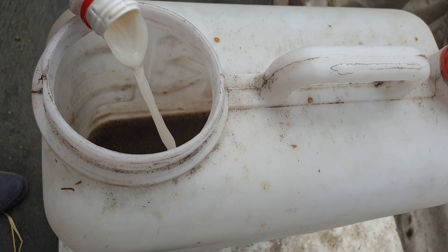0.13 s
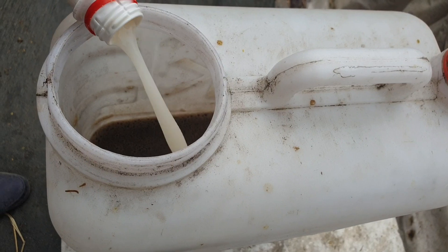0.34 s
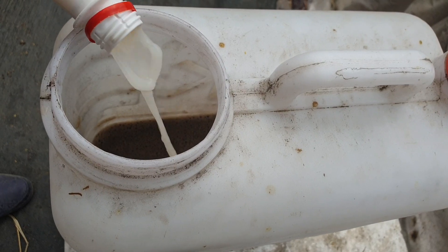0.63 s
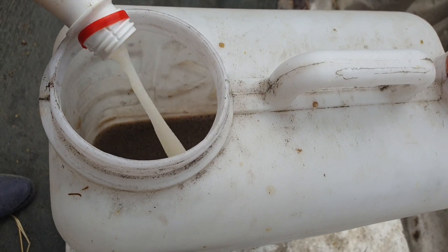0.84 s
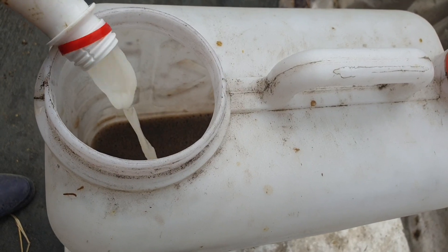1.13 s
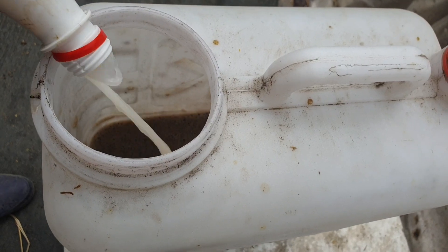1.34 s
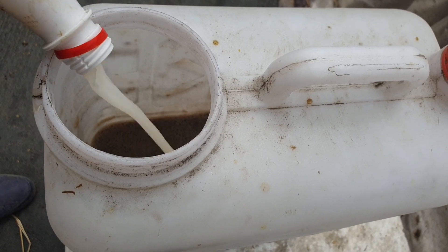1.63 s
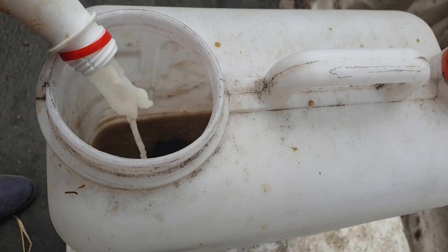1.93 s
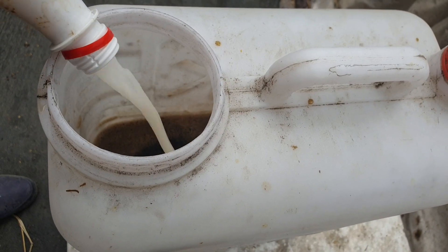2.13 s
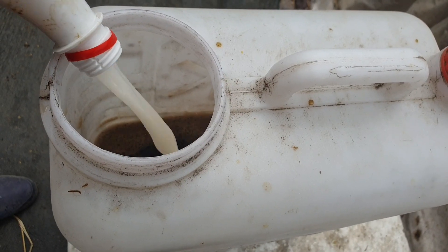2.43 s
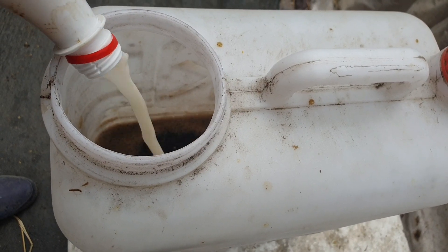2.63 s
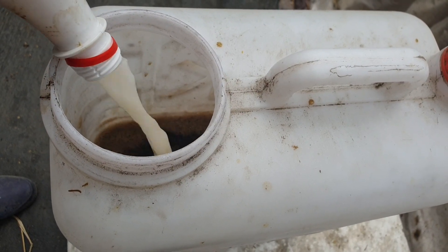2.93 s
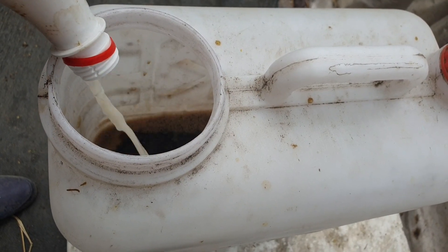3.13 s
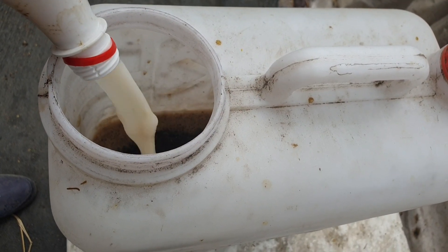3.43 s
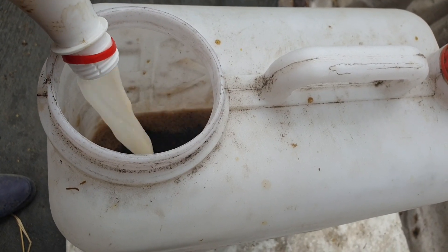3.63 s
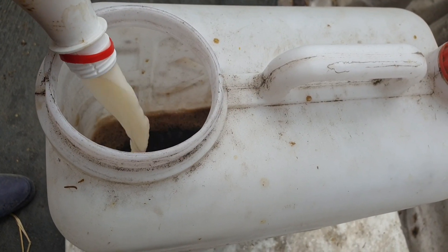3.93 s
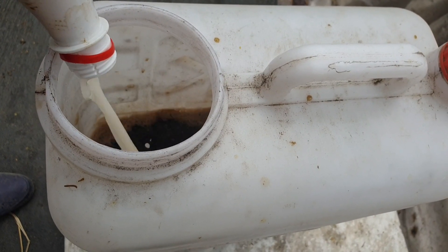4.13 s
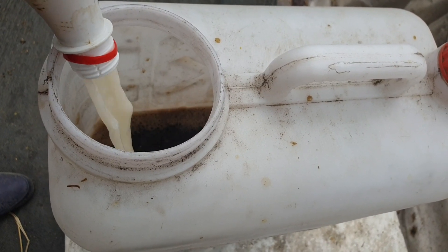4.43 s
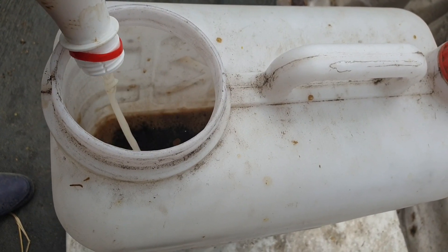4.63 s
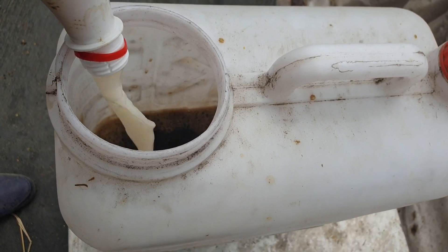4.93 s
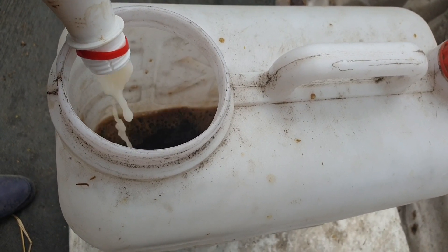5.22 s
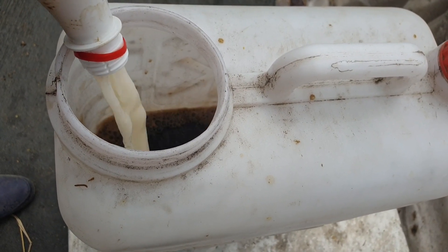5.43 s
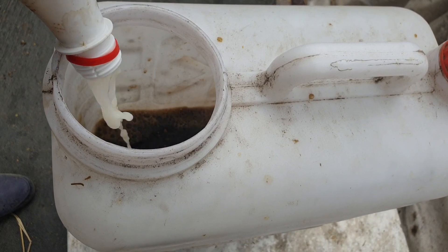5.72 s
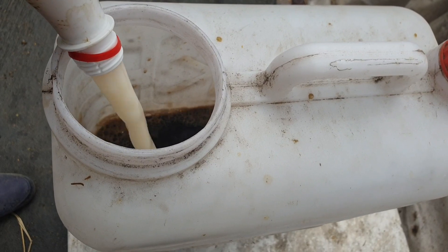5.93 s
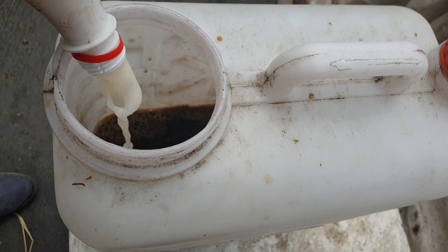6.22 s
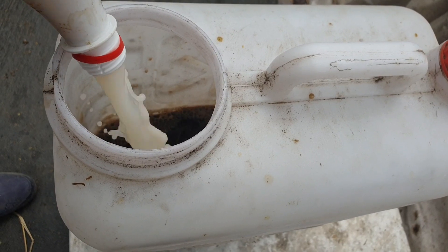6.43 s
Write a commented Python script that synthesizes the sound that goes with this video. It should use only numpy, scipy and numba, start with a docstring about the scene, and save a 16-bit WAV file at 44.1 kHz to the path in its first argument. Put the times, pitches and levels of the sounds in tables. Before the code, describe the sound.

Uneven gulping pour into a hollow plastic container, deep bubbling and bright spatter growing fuller, then a cluster of loud bottle clicks.

```python
"""Over a quiet outdoor floor come a few soft drips and glugs, then a stream from a bottle plunges into
a part-filled plastic jug, close below a phone. Trapped air bubbles, built from decaying sines that climb in
pitch, ring the air and walls of the jug. Filtered noise and short grains make the droplets, which spatter
in clumps. Towards the end the squeezed bottle snaps, each snap a short burst of noise.
The left microphone port hears the treble a little before the right."""
import sys
import numpy as np
from scipy import signal
from scipy.fft import rfft, irfft
from scipy.io import wavfile
from scipy.ndimage import uniform_filter1d
from numba import njit

SR = 44100
rng = np.random.default_rng(int(sys.argv[2]) if len(sys.argv) > 2 else 0)


def volts(x):
    """Linear amplitude factor 10**(x/20) for a level x in dB, scalar or array-like."""
    e = np.asarray(x, float) / 20
    return 10 ** e


def file_out(sig):
    """Save sig as 16-bit WAV at sys.argv[1]."""
    # one column per channel
    cols = np.atleast_2d(sig).T
    # limit, then scale
    lim = np.clip(cols, -1, 1)
    pcm = np.round(lim * 32767).astype(np.int16)
    wavfile.write(sys.argv[1], SR, pcm)


N = 290178  # length in samples
T = np.arange(N) / SR  # seconds
COARSE = T[::44]  # about one moment a millisecond, for the moving levels

# How hard the stream lands and how much it breaks into droplets, before each layer's own trim.
# Each row: time in seconds, flow in dB, break-up in dB.
FLOW = [(0, -80, -73.5), (0.2, -60, -66.5), (0.9, -50.5, -67.5), (1.06, -50.5, -57), (1.2, -50.5, -60),
        (1.6, -40.5, -52), (2.2, -40, -54), (2.9, -38, -52.5), (3.2, -41, -54), (3.6, -36.5, -50.5),
        (4.1, -37.5, -51), (4.7, -35, -50), (5.0, -40, -51.5), (5.4, -35.5, -49), (5.75, -35.5, -51),
        (5.9, -41.5, -54.5), (6.2, -42.5, -54.5), (6.58, -43, -56)]
# The stream thins as the bottle gulps air, then comes back at once.
# Each row: return in seconds, depth in dB before the layer's share, thinning time in seconds.
BREAKS = [(1.501, 6, 0.074), (1.74, 6, 0.14), (2.031, 6, 0.032), (2.32, 3, 0.065), (2.549, 7.5, 0.046),
          (2.636, 6.5, 0.027), (2.84, 6, 0.066), (3.068, 6.5, 0.11), (3.35, 8.5, 0.038), (3.633, 8, 0.0056),
          (4.205, 4, 0.11), (4.46, 2.5, 0.042), (5.455, 3.5, 0.093), (5.531, 6.5, 0.069),
          (5.65, 2.5, 0.033), (6.125, 9, 0.052), (6.457, 10, 0.037), (6.557, 9, 0.076)]
# How deeply each layer feels a break.
# One factor each, without unit, for plunge, froth, throb, splash and fizz.
BREAK_SHARES = (1.54, 2, 0.29, 1.32, 1.02)
# Heavy slugs of liquid landing.
# Each row: landing in seconds, extra plunge in dB, extra froth in dB.
SLUGS = [(0.146, 21, 22), (0.29, 8, 8), (0.62, 8, 3), (1.109, 21.5, 14), (1.329, 15, 11.5), (1.529, 9, 9),
         (1.769, 4.5, 6.5), (1.88, 5, 4), (2.66, 4, 3.5), (2.97, 1, 0), (3.27, 8.5, 8.5),
         (3.383, 11.5, 6.5), (3.82, 4, 4), (4.06, -1.5, 1.5), (4.219, 7, 6), (4.62, 0, -2.5),
         (5.136, 15, 5), (5.575, 3.5, 4), (6.058, 13, 9), (6.43, 5, 5.5), (6.57, 12.5, 7)]
# The flat side of the jug heaving as the liquid sloshes.
# Each row: crest in seconds, extra throb in dB.
HEAVES = [(1.13, 15.5), (1.2, 15), (1.42, 12), (1.7, 17), (1.91, 12.5), (2.22, 9), (2.49, 7), (2.72, 13),
          (2.99, 12), (3.17, 14), (3.5, 11), (3.76, 6), (4.24, 10.5), (4.5, 5.5), (4.67, 5.5), (4.85, 5),
          (5.0, 7), (5.2, 9), (5.58, 8), (5.94, 9), (6.21, 10.5)]
# Sheets of spray thrown up; a negative extra is a dip.
# Each row: peak in seconds, extra coarse splash in dB, extra fine fizz in dB.
SPLASHES = [(0.072, 17, 7), (0.12, 13, 15), (0.471, 13.5, -2), (0.61, 10, -12), (1.19, 6, 14),
            (1.302, 10, -2), (1.51, 8, -8), (1.581, 14, 3), (1.692, 4, 8), (1.762, 6, -3), (2.066, 13, 12),
            (2.12, 0, 0), (2.271, 15.5, -5), (2.341, 16.5, 0), (2.478, 15, 1), (2.579, 6.5, 12),
            (2.701, 7, 5), (2.857, 10, 6), (2.932, 14, -3), (3.3, -20, 6), (3.434, 4.5, 6), (3.59, 2, 3),
            (3.81, -3, -23), (3.884, 6, 12.5), (4.15, -2, 12), (4.221, 9.5, 4), (4.34, 10, -3),
            (4.414, 11, 9), (4.862, 14, 0), (5.468, 2, 9), (5.598, 8.5, 11.5), (5.675, 5.5, 4),
            (5.693, 14, 7), (5.781, 1, -22), (6.178, 15.5, 16.5), (6.489, 10, 7)]


def stream_levels():
    """dB of plunge, froth, wall throb, coarse splash and fizz, all led by the flow and its breaks."""
    s, flow, breakup = np.transpose(FLOW)
    flow, breakup = np.interp(COARSE, s, flow), np.interp(COARSE, s, breakup)
    s, depth, thinning = np.transpose(BREAKS)
    gap = swell(s, depth, thinning, settle_s=0.0072)
    s, plunge, froth = np.transpose(SLUGS)
    at, coarse, fizz = np.transpose(SPLASHES)
    heave_s = 0.063  # half-width of a heave
    heave = sum(db * np.exp(-((COARSE - crest) / heave_s) ** 2) for crest, db in HEAVES)
    froth_db, throb_db, fizz_db = -7, -7, -0.5  # against the flow, the flow and the break-up
    layers = (flow + swell(s, plunge, rise_s=0.017, settle_s=0.083),
              flow + froth_db + swell(s, froth, rise_s=0.017, settle_s=0.041),
              flow + throb_db + heave,
              breakup + swell(at, coarse, rise_s=0.012, settle_s=0.012),
              breakup + fizz_db + swell(at, fizz, rise_s=0.012, settle_s=0.012))
    return [np.interp(T, COARSE, db - share * gap) for db, share in zip(layers, BREAK_SHARES)]


# Air and wall resonances of the jug.
# Each row: frequency in Hz, width in Hz, relative gain in dB.
JUG = [(154, 31, -1.5), (220.7, 13.4, 0), (279, 16.5, 0), (411.5, 19, -24.5), (549, 15, -10),
       (682.3, 21, -9), (860, 17.4, -5), (1058, 65, -19.5), (1295, 18, -1.5), (1450, 18, -14)]
# The flat side of the jug flexing.
# Each row: frequency in Hz, width in Hz, relative gain in dB.
THROB = [(61.8, 22, -5), (81.7, 30, -6.5), (123.3, 5.9, 6.5)]


def jug(plunge_db, froth_db, throb_db):
    """Bubbles of all sizes drive the air and walls of the jug."""
    low = [mode for mode in JUG if mode[0] < 350]
    high = [mode for mode in JUG if mode[0] >= 350]

    big = swarm(200, 108.0, 392, cycles=8.4, spread_db=1.0, glide=0.049)
    plunge = volts(plunge_db - 1.5) * unit(ring(big, low) + volts(-35.0) * big)

    small = swarm(600, 372.6, 2530, cycles=12.8, spread_db=2.2, glide=0.13)
    froth = unit(ring(small, high) + volts(-19.5) * small)
    froth = volts(froth_db + 1.0) * clumps(37, 0.063, 0.15) * froth

    surge = swarm(200, 47.4, 101.5, cycles=5.0, spread_db=-1.5, glide=0.13)
    throb = volts(throb_db + 2.5) * unit(ring(surge, THROB))

    clear = clear_bubbles()
    ringing_on = volts(-14.0) * ring(clear, JUG)  # the jug rings on after each clear bubble
    return plunge + froth + throb + clear + ringing_on


# Big air pockets closing under the surface.
# Each row: start in seconds, level in dB before trim, starting pitch in Hz, 60 dB decay in seconds before limits.
GLUGS = [(0.155, -25.5, 222.6, 0.16), (0.382, -27.5, 203, 0.041), (1.108, -6, 122, 0.1),
         (1.147, -14.5, 161.3, 0.2), (1.355, -20, 154, 0.071), (1.516, -19.5, 295, 0.054),
         (1.839, -16, 163, 0.069), (2.067, -26.5, 221, 0.2), (2.336, -28, 275, 0.25),
         (2.583, -24, 212, 0.46), (2.661, -12, 132, 0.079), (2.712, -1, 108, 0.033),
         (2.975, -15.5, 143, 0.2), (3.105, -21, 135, 0.088), (3.238, -18.5, 254, 0.18),
         (3.38, -9, 178, 0.096), (3.67, -19, 185.7, 0.24), (4.213, -17.5, 251, 0.085),
         (4.227, -17, 151, 0.23), (4.258, -24, 137, 0.086), (4.347, -11, 140, 0.04),
         (4.418, -12.5, 157, 0.077), (4.622, -15, 143.5, 0.19), (4.696, -18.5, 178, 0.18),
         (4.723, -15.5, 137, 0.11), (4.793, -10, 164, 0.045), (4.985, -15, 147.5, 0.21),
         (5.132, -13.5, 300, 0.047), (5.15, -14.5, 160.5, 0.17), (5.188, -6, 164, 0.089),
         (5.222, -12, 208, 0.058), (5.257, -12.5, 139.7, 0.18), (5.367, -9.5, 138, 0.055),
         (5.565, -19, 203, 0.049), (5.578, -9, 120, 0.071), (5.607, -17, 142, 0.083),
         (5.712, -16.5, 144, 0.075), (5.79, -7.5, 163, 0.057), (5.841, -18, 207, 0.18),
         (6.077, -17.5, 142, 0.11), (6.295, -19, 148.4, 0.17), (6.439, -17, 145, 0.18)]
# Single clear bubbles.
# Each row: start in seconds, level in dB before trim, starting pitch in Hz, 60 dB decay in seconds before limits.
PLOPS = [(0.115, -40.5, 1030, 0.047), (0.29, -38.5, 550, 0.076), (0.636, -36, 670, 0.14),
         (0.972, -35.5, 665, 0.36), (1.342, -33, 1280, 0.1), (1.773, -15.5, 724, 0.054),
         (1.975, -27.5, 678, 0.17), (2.07, -25.5, 1280, 0.089), (2.074, -31, 693, 0.13),
         (2.13, -26.5, 1274, 0.12), (2.155, -18, 620, 0.03), (2.581, -22, 487, 0.03),
         (2.785, -26, 568, 0.085), (2.965, -18.5, 684, 0.025), (3.079, -18.5, 695, 0.063),
         (3.211, -27, 670, 0.079), (3.268, -20, 865, 0.039), (3.385, -25, 689, 0.14),
         (3.438, -21, 1346, 0.072), (3.6, -26.5, 1310, 0.12), (3.751, -20, 648, 0.076),
         (3.817, -11, 671.6, 0.19), (3.835, -22, 690, 0.085), (3.872, -17, 686, 0.048),
         (3.986, -20.5, 815, 0.058), (4.059, -20, 1288, 0.06), (4.179, -13, 1180, 0.0091),
         (4.283, -26.5, 670, 0.16), (4.59, -24, 846, 0.12), (4.625, -25, 448, 0.084),
         (4.673, -27.5, 873, 0.09), (4.917, -19.5, 1450, 0.026), (5.136, -23, 1295, 0.084),
         (5.33, -32.5, 1320, 0.23), (5.464, -23, 412, 0.044), (5.477, -26.5, 744, 0.14),
         (5.522, -22, 688, 0.16), (5.562, -10.5, 1060, 0.015), (5.567, -20.5, 850, 0.07),
         (5.594, -13, 640, 0.023), (5.637, -31, 1240, 0.11), (5.679, -30, 834, 0.1)]


def clear_bubbles():
    """Bubbles loud enough to be heard one by one: decaying sines whose pitch climbs as they ring."""
    out = np.zeros(N)
    for table, glide, rise in ((GLUGS, 0.348, 0.75), (PLOPS, 0.078, 1.57)):
        s, db, hz, t60 = np.transpose(table)
        start = (s * SR).astype(np.int64)
        out += grains(N, start, hz, np.clip(t60, .01, .4), volts(db - 6.5), glide, rise)
    return out


# Tone of the droplets.
# Each row: frequency in Hz, relative level in dB per Hz.
SPATTER = [(880, -15), (1500, -2), (2050, 1), (2900, -1.5), (4100, -3.5), (4710, -0.5), (5310, -8),
           (6430, -9.5), (7320, -14), (9790, -5.5), (11800, -3), (14800, -17), (15600, -28), (16300, -22)]


def spatter(splash_db, fizz_db):
    """Droplets crackle and plink over a hiss; each octave comes in its own quick clumps."""
    crackle = swarm(1200, 1770, 15800, cycles=3.4, spread_db=3.5, glide=0.25)
    plinks = swarm(300, 1309, 7450, cycles=154.0, spread_db=1.5, glide=0.16)
    # the finest droplets land as bare ticks, 450 a second
    when, size, sign = rng.random((4000, 3))[:int(450 * N / SR)].T
    heights = np.sign(sign - .5) * volts(-3.0 * np.log(size + 0.014))
    ticks = unit(np.bincount((when * N).astype(int), heights, N))
    hiss = rng.standard_normal(N)
    mist = hiss + volts(-5.5) * ticks + volts(-5.5) * crackle + volts(-4.5) * plinks
    spray = rfft(unit(colour(mist, SPATTER)))

    octave = np.log2(np.fft.rfftfreq(N, 1 / SR) / 1900 + 1e-9).clip(0, 3)  # octaves above 1900 Hz
    together = clumps(30, 0.033, 0.43)
    out = 0
    for k, level_db in enumerate((splash_db, splash_db, (splash_db + fizz_db) / 2, fizz_db)):
        # overlapping shares that add up to the whole spray
        band = irfft(spray * np.clip(1 - abs(octave - k), 0, 1), N)
        own_clumps = clumps(70, 0.0065, 0.13)
        out = out + band * together * own_clumps * volts(level_db + 3.5 + 0.34 * walk(43))
    return out


# Drops slapping the surface and wall.
# Each row: start in seconds, peak in dB, centre in Hz, 60 dB decay of the tail in seconds.
DROPS = [(0.365, -36.5, 4600, 0.078), (0.483, -40, 4600, 0.04), (0.525, -39, 2920, 0.064),
         (0.753, -40, 4700, 0.05), (0.936, -33, 2980, 0.067), (1.5146, -29, 9960, 0.01),
         (1.522, -11, 2390, 0.032), (1.5733, -29.5, 10100, 0.02), (1.632, -29, 4700, 0.01),
         (1.6808, -16, 3600, 0.011), (1.754, -28, 2900, 0.028), (1.767, -23, 1900, 0.04),
         (2.0646, -26, 1800, 0.04), (2.113, -17.5, 12000, 0.028), (2.136, -23, 11600, 0.052),
         (2.152, -21.5, 4680, 0.098), (2.249, -28, 10500, 0.02), (2.341, -27, 4650, 0.055),
         (2.4634, -23, 11500, 0.057), (2.5088, -23.5, 11900, 0.043), (2.654, -18.5, 4740, 0.0077),
         (2.707, -19, 10100, 0.064), (2.933, -18.5, 4630, 0.016), (3.083, -21.5, 2960, 0.14),
         (3.134, -31, 4580, 0.024), (3.166, -19.5, 2370, 0.19), (3.3, -17, 8300, 0.058),
         (3.355, -27, 11500, 0.074), (3.5055, -23.5, 10100, 0.02), (3.5358, -26, 9850, 0.03),
         (3.591, -18, 4940, 0.049), (3.6501, -25, 11700, 0.033), (3.671, -20, 4940, 0.21),
         (3.8088, -15, 12100, 0.065), (3.918, -25, 4820, 0.022), (4.0256, -19.5, 4700, 0.018),
         (4.0307, -25, 11600, 0.008), (4.1563, -9, 4560, 0.016), (4.215, -22, 1600, 0.03),
         (4.225, -24, 2550, 0.04), (4.233, -21.5, 12000, 0.01), (4.348, -20, 4660, 0.034),
         (4.415, -16, 11900, 0.024), (4.468, -23, 4070, 0.033), (4.5334, -20, 9800, 0.095),
         (4.608, -23, 11700, 0.033), (4.744, -27, 10500, 0.02), (4.8171, -37, 2250, 0.03),
         (4.858, -26, 2490, 0.04), (4.881, -22, 10400, 0.025), (4.912, -20, 6450, 0.042),
         (5, -20.5, 11000, 0.015), (5.0867, -22, 11500, 0.02), (5.133, -25.5, 10200, 0.02),
         (5.1866, -21, 12100, 0.1), (5.291, -24, 11500, 0.062), (5.36, -19.5, 5100, 0.08),
         (5.475, -15, 12200, 0.046), (5.566, -25, 2240, 0.02), (5.5957, -12.5, 3240, 0.033),
         (5.785, -17, 10300, 0.099)]


def drops():
    """Each loud drop is a tick, a crack and a short wet tail, brightest near its own centre."""
    out = np.zeros(N)
    for s, db, hz, t60 in DROPS:
        span = slice(int(s * SR), int(s * SR) + 4000)
        hit = burst(s, max(t60, .005), crack_s=.0006, tail_db=-9)[span] * rng.standard_normal(4000)
        hit[1] += 9.0  # the first contact is one sharp tick
        # 5 dB per octave down below the centre, 4 above it
        tone = [(f, d - (5.0 if f < hz else 4.0) * abs(np.log2(f / hz))) for f, d in SPATTER]
        slap = colour(hit, tone)[:len(hit)]
        out[span] += volts(db) * slap / np.abs(slap).max()
    return out


# The bottle wall snapping.
# Each row: start in seconds, level in dB before trim, left minus right in dB, 60 dB decay of the rattle in seconds.
SNAPS = [(5.874, -3, -1, 0.036), (5.9178, -2.5, -8, 0.018), (5.9342, -4.5, -1.5, 0.042),
         (5.973, -6, -6, 0.056), (6.0118, -6, -5.5, 0.055), (6.039, -4, -3, 0.052), (6.282, -17, -1, 0.057),
         (6.381, -4, -3, 0.055)]
# Tone of a snap.
# Each row: frequency in Hz, relative level in dB per Hz.
SNAP = [(350, -7), (600, -7.5), (1670, -4.5), (2180, -3.5), (4240, -0.5), (5440, -6.5), (6160, -2.5),
        (7060, -3.5), (8300, -8.5), (10000, 0), (13400, -5), (14400, -13), (15600, -20), (16500, -39)]


def bottle():
    """Each snap is a millisecond crack with a short rattle, different at the two ports."""
    out = np.zeros((2, N))
    for s, db, pan_db, t60 in SNAPS:
        span = slice(int(s * SR), min(int(s * SR) + 6000, N))
        shape = burst(s, max(t60, .005), crack_s=0.001, tail_db=-5.5)[span]
        shared = rng.standard_normal(len(shape))
        shared[1] += 9.0  # the wall lets go in one sharp step
        for side, sign in enumerate((1, -1)):
            mix = shared + 1.79 * rng.standard_normal(len(shape))
            crack = colour(shape * mix, SNAP)[:len(shape)]
            out[side, span] += volts(db + 2.5 + sign * pan_db / 2) * crack / np.abs(crack).max()
    out[1] = np.roll(out[1], 14)  # right port hears it 14 samples later
    return out


def hollow(x, t60_s, wet_db):
    """The many high air modes of the jug: a short dense tail that smears each droplet into the next."""
    age = np.arange(6000) / SR
    tail = rng.standard_normal(len(age)) * np.exp(-np.log(1000) * age / t60_s)
    wet = volts(wet_db) * signal.fftconvolve(x, tail / np.linalg.norm(tail))[:N]
    return (x + wet) / np.hypot(1, volts(wet_db))


def mouth(pour):
    """Reflections inside the jug mouth; their pattern shifts as the landing point wanders."""
    fade = np.exp(-np.arange(700) / (0.0021 * SR))
    echoes = rfft(rng.standard_normal((6, 700)) * fade, 2048)
    # even out the patterns so that on average they colour next to nothing
    echoes = irfft(echoes / np.linalg.norm(echoes, axis=0))[:, :700]
    share = np.array([walk(220) for _ in echoes])
    share = share / np.linalg.norm(share, axis=0)
    return sum(w * signal.fftconvolve(pour, e / np.linalg.norm(e))[:N] for w, e in zip(share, echoes))


# Phase by which the left port is ahead of the right.
# Each row: frequency in Hz, lead in radians.
LEAD = [(0, 0), (340, 0), (1030, .8), (1550, 2.3), (2500, 3.2), (3960, 2.9), (4740, 5), (5340, 9.4),
        (8530, 22.3), (9220, 22.1), (11100, 29.3), (14900, 38.3)]
# Difference in tone between the ports.
# Each row: frequency in Hz, left minus right in dB.
TILT = [(60, 4), (110, 0.5), (200, 0), (380, -4), (700, -3), (1290, -5), (2380, 4), (4400, -6.5),
        (8120, -3.5), (15000, -0.5)]
# Gain of the sound that each port picks up on its own.
# Each row: frequency in Hz, gain in dB.
SCATTER = [(40, -10), (150, -18.5), (400, -10), (1000, -5), (3000, 1.5), (8000, 6.5), (16000, 9)]


def ports(near, stray):
    """Two ports: each has its own colour and delay, and picks up some sound the other does not."""
    hz = np.fft.rfftfreq(N, 1 / SR)
    lead = np.interp(hz, *np.transpose(LEAD))
    # half the difference goes to the left, its inverse to the right
    half = volts(read(TILT, hz) / 2) * np.exp(.5j * lead)
    heard = rfft(near) + rfft(stray) * volts(read(SCATTER, hz))
    return irfft(heard * np.array([half, 1 / half]), N)


# Tone of the quiet outdoor floor.
# Each row: frequency in Hz, relative level in dB per Hz.
YARD = [(15, -55), (25, -3), (190, 1.5), (354, -11.5), (677, -11.5), (2760, -26.5), (4610, -31.5),
        (11900, -51), (14800, -53), (16000, -99)]


def yard():
    """Quiet outdoor floor: steady noise, heaviest in the bass."""
    return volts(-56.0) * unit(colour(rng.standard_normal(N), YARD))


def swarm(per_s, low_hz, high_hz, cycles, spread_db, glide):
    """Bubbles at random moments and pitches, at rms 1; a positive spread makes a few much larger."""
    when, pitch, size = rng.random((9000, 3))[:int(per_s * N / SR)].T
    hz = low_hz * (high_hz / low_hz) ** pitch
    gain = volts(-spread_db * np.log(np.clip(size, 3e-3, 1)))
    return unit(grains(N, (when * N).astype(np.int64), hz, cycles / hz, gain, glide, 0.56))


@njit
def grains(n, start, hz, t60, size, glide, rise):
    """Decaying sines that swell in `rise` cycles and climb in pitch by `glide` over their ring."""
    out = np.zeros(n)
    for k in range(len(start)):
        length = int(t60[k] * SR)
        cycle = 0.
        for i in range(min(length, n - start[k])):
            cycle += hz[k] * (1 + glide * i / length) / SR
            level = size[k] * np.exp(-6.9 * i / length) * min(cycle / rise, 1.)
            out[start[k] + i] += level * np.sin(2 * np.pi * cycle)
    return out


def ring(x, modes):
    """Sum of two-pole resonances with alternating sign."""
    out = 0
    for k, (hz, width, db) in enumerate(modes):
        b, a = signal.iirpeak(hz, hz / width, SR)
        out = out + (-1) ** k * volts(db) * signal.lfilter(b, a, x)
    return out


def clumps(per_s, fade_s, height):
    """Gain that jumps as a clump of drops lands and sinks back; rms 1."""
    when, size = rng.random((1000, 2))[:int(per_s * N / SR)].T
    lands = np.bincount((when * N).astype(int), -height * np.log(size + 0.00058), N)
    return unit(1 + signal.lfilter([1], [1, -np.exp(-1 / (fade_s * SR))], lands))


def burst(s, t60_s, crack_s, tail_db):
    """Envelope of a blow: a short crack, then a weaker tail."""
    age = np.clip(T - s, 0, None)
    crack = np.exp(-age / crack_s)
    tail = volts(tail_db) * np.exp(-np.log(1000) * age / t60_s)
    return (T >= s) * (crack + tail)


def swell(s, db, rise_s, settle_s):
    """Extra dB that climbs to each event in a straight line and dies away exponentially after it."""
    out = np.zeros(len(COARSE))
    rises = np.broadcast_to(np.clip(rise_s, .004, 1), len(s))
    for at, extra, rise in zip(s, db, rises):
        age = COARSE - at
        climb = np.clip(1 + age / rise, 0, 1)
        out = out + extra * np.where(age < 0, climb, np.exp(-np.abs(age) / settle_s))
    return out


def walk(rate):
    """Random levels held 1 / rate s and slewed twice; rms 1."""
    k = int(SR / rate)
    held = rng.standard_normal(4000)[np.arange(N) // k]
    return unit(uniform_filter1d(uniform_filter1d(held, k), k))


def colour(x, table):
    """Causal filter with the table's gain, folded from the cepstrum."""
    log_gain = read(table, np.fft.rfftfreq(2048, 1 / SR)) * np.log(10) / 20
    cepstrum = irfft(log_gain)
    cepstrum[1:1024] *= 2
    cepstrum[1025:] = 0
    response = irfft(np.exp(rfft(cepstrum)))[:1024]
    return signal.fftconvolve(x, response)[:N]


def read(table, hz):
    """A (Hz, value) table read on a log-frequency axis."""
    f, v = np.transpose(table)
    return np.interp(np.log(hz + 1), np.log(f + 1), v)


def unit(x):
    """Scaled to rms 1."""
    return x / np.sqrt(np.mean(x ** 2))


def scene():
    """Stream, jug and bottle over a quiet outdoor floor."""
    plunge_db, froth_db, throb_db, splash_db, fizz_db = stream_levels()
    spray = hollow(spatter(splash_db, fizz_db), t60_s=0.06, wet_db=-0.83)
    pour = jug(plunge_db, froth_db, throb_db) + spray
    slaps = hollow(drops(), t60_s=0.044, wet_db=-9.0)
    # single drops reach the ports more directly than the wash
    echoed = pour + volts(-5.5) * slaps
    # each port has its own reflections and its own share of the floor
    stray = np.array([mouth(echoed) + yard(), mouth(echoed) + yard()])
    return ports(pour + slaps + yard(), stray) + bottle()


def roll_off(x):
    """The treble ends steeply here."""
    return signal.sosfilt(signal.butter(12, 16830, fs=SR, output="sos"), x)


def record(dry):
    """The phone drops the deepest bass, clips at full scale and cuts the top."""
    thin = signal.sosfilt(signal.butter(2, 38, "highpass", fs=SR, output="sos"), dry)
    clipped = np.clip(thin, -1, 1)
    cut = signal.sosfilt(signal.ellip(8, .2, 70, 16500, fs=SR, output="sos"), clipped)
    return roll_off(cut)


dry = scene()
out = record(dry)
file_out(out)
```